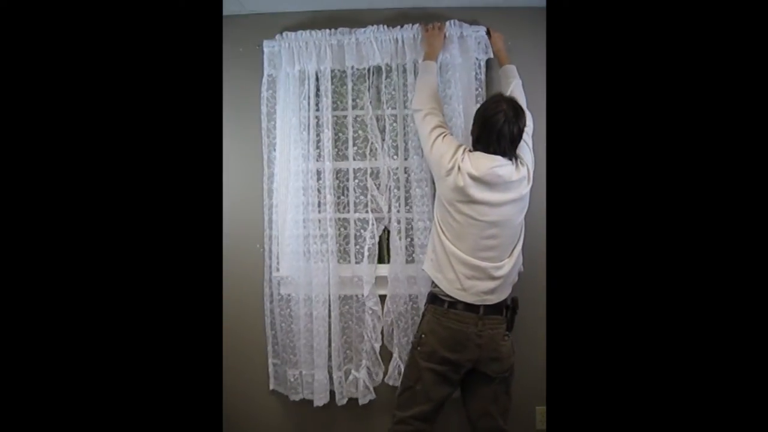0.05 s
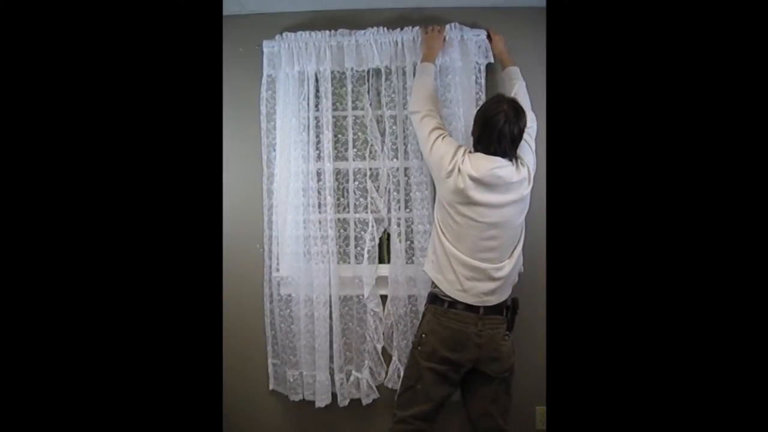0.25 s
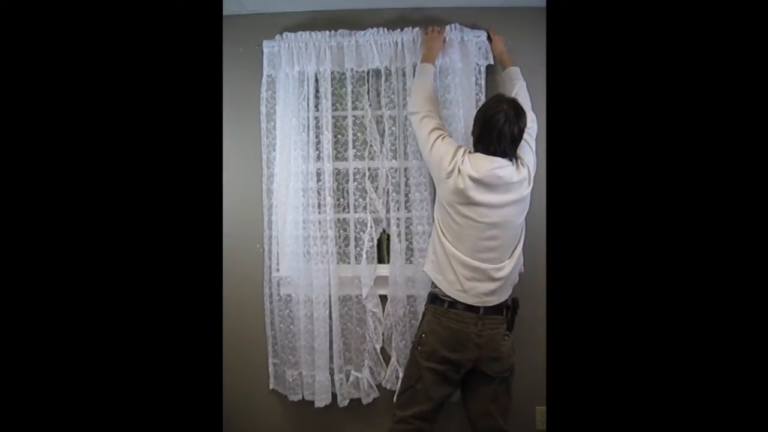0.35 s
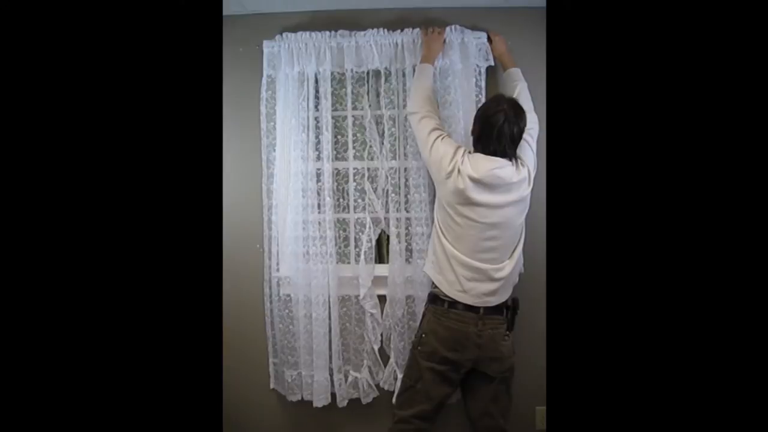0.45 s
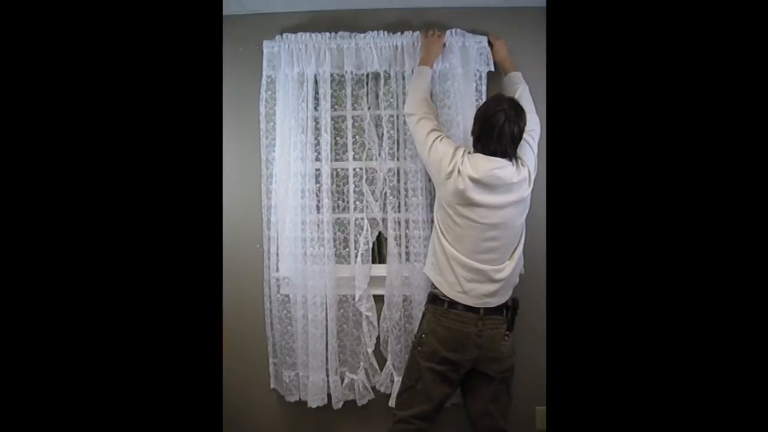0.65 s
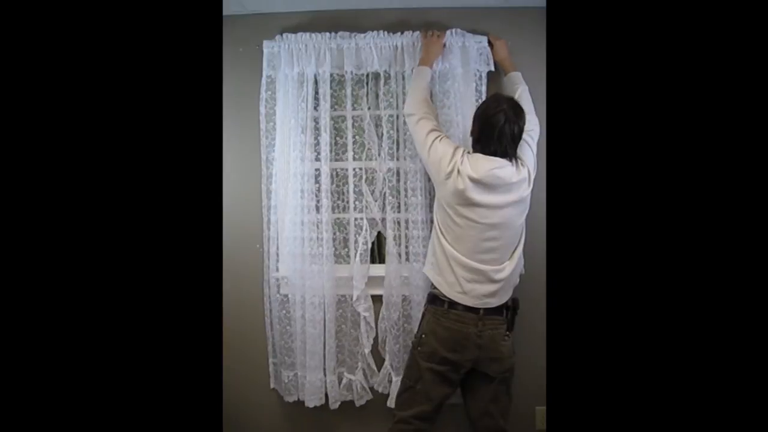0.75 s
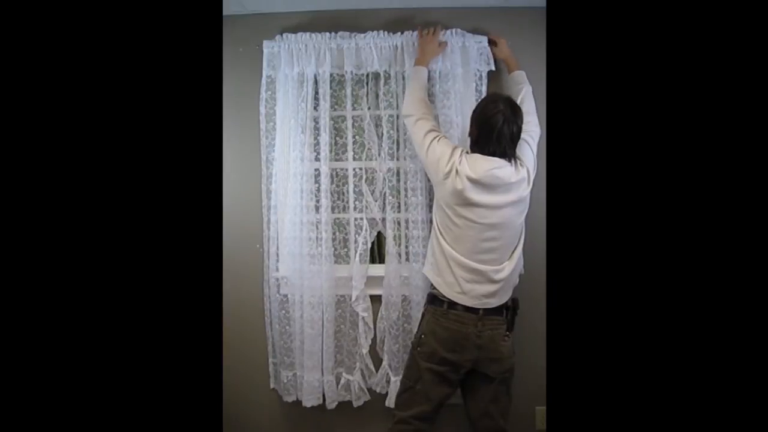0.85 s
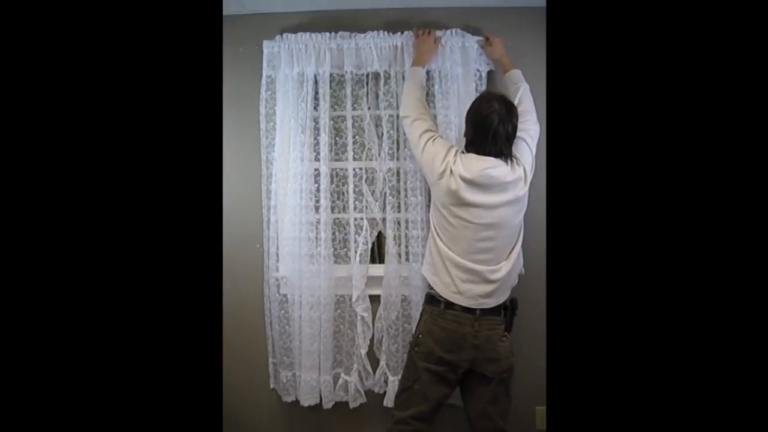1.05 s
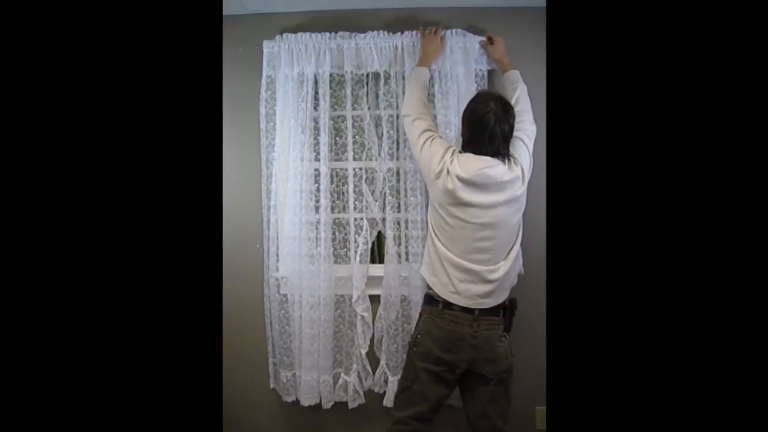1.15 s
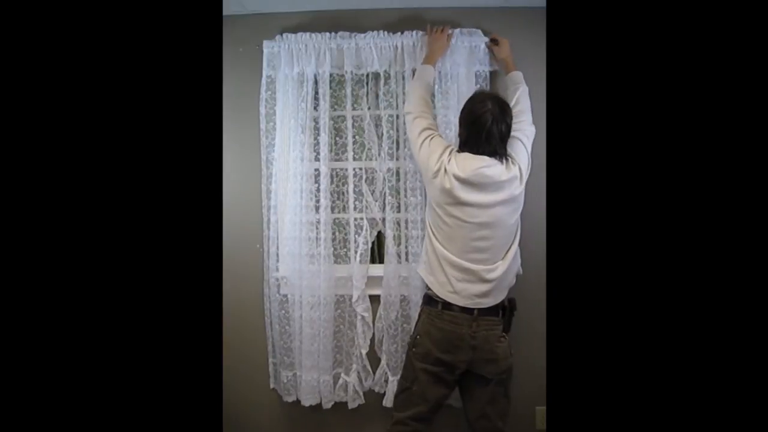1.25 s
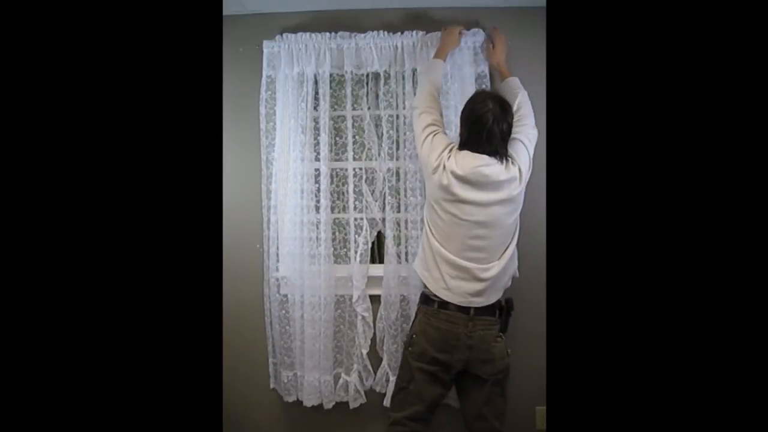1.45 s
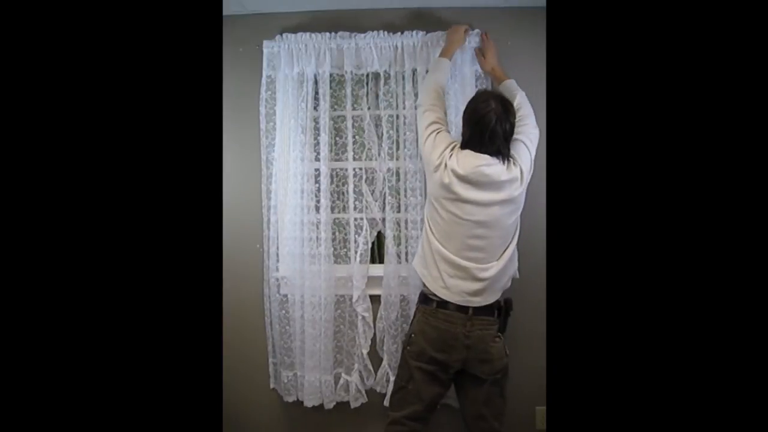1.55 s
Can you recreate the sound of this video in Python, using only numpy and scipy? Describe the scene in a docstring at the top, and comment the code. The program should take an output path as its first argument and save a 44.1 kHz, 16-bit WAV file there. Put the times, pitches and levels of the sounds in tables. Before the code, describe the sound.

Short, ringing metal knocks of a curtain rod hitting its bracket, over quiet room hiss.

```python
"""A bare, ringing room, where a metal curtain rod is pushed against its wall bracket.
Each knock is a short chattering crack, a ring of the hollow rod and a thud of the wall behind it.
The curtain rustles faintly along the rod over a bed of hiss, soft drone and low hum.
Everything is heard from a few metres away, nearly mono."""
import sys
import numpy as np
from scipy import signal
from scipy.fft import rfft, irfft
from scipy.io import wavfile

SR = 44100
rng = np.random.default_rng(int(sys.argv[2]) if len(sys.argv) > 2 else 0)


def to_wav(sig):
    """Store sig (one row per channel, or 1-D mono) as 16-bit WAV at the path in sys.argv[1].

    Samples outside -1..1 are clipped; the rate is SR.
    """
    pcm = np.clip(np.atleast_2d(sig), -1, 1) * 32767
    pcm = np.round(pcm).astype(np.int16)
    wavfile.write(sys.argv[1], SR, pcm.T)  # frames by channels


N = 70560

# tone of the room hiss (frequency [Hz], relative level [dB])
HISS_TONE = [(20, -28), (38, -16), (52, -33), (70, -13), (105, -10), (135, -5), (175, -8.5), (225, -7),
             (330, -9), (480, -10.5), (790, -12.5), (1300, -18.5), (2200, -24.5), (3300, -26), (6000, -29),
             (7900, -40.5), (10000, -34)]
# fader curve of the low hum (time [s], level [dB])
HUM_FADER = [(0, -61), (.17, -50), (.3, -58), (.5, -61), (.7, -59), (1.0, -73), (1.6, -74)]
# early reflections (delay [s], gain [dB])
EARLY_ECHOES = [(.0015, -17), (.0095, -20), (.0176, -11), (.0238, -20), (.0335, -17)]
# tone of the reflections from the corner of wall and ceiling (frequency [Hz], gain [dB])
CORNER_TONE = [(200, -30), (1500, -27), (2500, 1.5), (4000, 6), (6500, 1), (9000, 0)]
# decay of the reverb tail (frequency [Hz], t60 [s])
TAIL_DECAY = [(150, 0.64), (500, 0.41), (1400, 0.39), (3500, 0.34), (6500, .36), (10000, 0.45)]
# stereo width of the tail (frequency [Hz], side minus mid [dB])
TAIL_WIDTH = [(100, 1.5), (700, -25), (2200, -23), (5000, -17.5), (9000, -15.5)]
# cues for cloth sliding on the rod (time [s], length [s], peak send to the room [dB])
RUSTLE_CUES = [(.85, 0.094, -50.5), (1.272, 0.098, -48), (1.476, 0.3, -44.5)]
# tone of the cloth (frequency [Hz], relative level [dB])
CLOTH_TONE = [(200, -15), (900, -23), (1600, -3), (3000, -2), (5000, -2.5), (7900, -11), (10000, -4.5)]
# modes of the bracket and wall (frequency [Hz], relative level [dB], t60 [s])
WALL_MODES = [(462, -9, .35), (552, -11, .4), (647, -10, .34), (775, -13, .25), (840, -5, .2),
              (915, 0, .28), (977, -6, .22)]
# modes of the hollow rod (frequency [Hz], relative level [dB], t60 [s])
ROD_MODES = [(2031, -5, .29), (2099, -4, .32), (2168, -1, .31), (2281, -7, .22), (2333, -5, .21),
             (2376, -2, .23), (2422, -8, .17), (2906, -8, .23), (2984, -8, .2), (3277, -8, .22),
             (3590, -7, .2), (4476, -6, .11), (4759, -13, .2)]
# tone of the crack (frequency [Hz], relative level [dB])
CRACK_TONE = [(60, -24), (200, -14.5), (380, -7), (620, -6.5), (950, 4.5), (1250, -3.5), (1700, -3.5),
              (2300, 2.5), (3000, 0), (4300, -1), (6400, -3.5), (7900, -15.5), (10000, -9)]
# knock cues (time [s], crack trim [dB], rod ring trim [dB], wall thud trim [dB],
# crack high cut [Hz], contact pitch [Hz], boost or cut at that pitch [dB])
KNOCK_CUES = [(0.0344, -12.5, -33, -10, 4810, 3760, 1), (0.2378, -2, 1, -8, 13600, 9060, 10.5),
              (0.2425, -1.5, -31.5, 1.5, 9800, 4400, 0), (0.2765, -10, -15, 1, 9000, 2320, 11),
              (0.306, -12, -8, -7, 9100, 490, -9), (0.4559, 5, -8, -3.5, 9200, 1840, 5),
              (0.6552, -7.5, -45, -4, 13000, 4400, -1.5), (0.8195, -21, -48, -13, 6240, 557, 18),
              (0.936, -28.5, -36, -29, 6480, 4700, 6.5)]


def amp(db):
    """Decibels to gain."""
    return 10 ** (np.asarray(db) / 20)


def unit_rms(x):
    """Scales to an rms of 1."""
    return x / np.sqrt(np.mean(x ** 2) + 1e-20)


def curve_at(points, hz):
    """Reads a curve on a log-frequency axis."""
    table_hz, values = np.transpose(points)
    return np.interp(np.log(hz + 1), np.log(table_hz + 1), values)


def add(mix, start_s, sound):
    """Drops a sound into the mix at its cue."""
    part = mix[max(round(start_s * SR), 0):][:len(sound)]
    part += sound[:len(part)]


def equalise(x, tone):
    """Shapes a signal with a tone curve."""
    hz = np.fft.rfftfreq(len(x), 1 / SR)
    return irfft(rfft(x) * amp(curve_at(tone, hz)), len(x))


def room_tone(hiss_db=-44.5, drone_db=-50, drone_hz=169.5, drone_width_hz=16.3, hum_hz=51.3):
    """The bed: steady hiss, a narrow band of noise that wavers as a drone, and a low hum that fades."""
    t = np.arange(N) / SR
    mid, side = (unit_rms(equalise(rng.standard_normal(N), HISS_TONE)) for _ in range(2))
    side *= amp(-35)  # nearly mono
    hiss = amp(hiss_db) * np.array([mid + side, mid - side])
    band = np.exp(-((np.fft.rfftfreq(N, 1 / SR) - drone_hz) / drone_width_hz) ** 2)
    drone = amp(drone_db) * unit_rms(irfft(rfft(rng.standard_normal(N)) * band, N))
    hum_gain = amp(np.interp(t, *np.transpose(HUM_FADER)))
    hum = hum_gain * unit_rms(np.sin(2 * np.pi * (hum_hz * t + rng.random())))
    return hiss + drone + hum


def reverb_tail(level_db=0.5, rise_s=0.008):
    """Mid and side of the dense reflections, which build up quickly and die away band by band."""
    hz, frame_s, bands = signal.stft(rng.choice([-1., 1.], (2, SR)), SR, nperseg=256)
    bands *= amp(-60 * frame_s / curve_at(TAIL_DECAY, hz)[:, None])
    bands[1] *= amp(curve_at(TAIL_WIDTH, hz))[:, None]
    fade_in = 1 - np.exp(-np.arange(SR) / SR / rise_s)
    tail = signal.istft(bands, SR, nperseg=256)[1][:, :SR] * fade_in
    return amp(level_db) * tail / np.linalg.norm(tail[0])


def in_room(sound, direct_db=-13, corner_db=-6.5, corner_delay_s=.0042, corner_spread_s=.002):
    """Puts a sound in the stereo room: direct path, a bright splash off the corner, echoes and tail."""
    t = np.arange(SR) / SR
    mid, side = reverb_tail()
    splash = rng.standard_normal(SR) * np.exp(-((t - corner_delay_s) / corner_spread_s) ** 2)
    mid += amp(corner_db) * equalise(splash / np.linalg.norm(splash), CORNER_TONE) * (t < .5)
    mid[0] += amp(direct_db)
    for delay_s, db in EARLY_ECHOES:
        add(mid, delay_s, amp([db]))
    response = np.array([mid + side, mid - side])
    return signal.fftconvolve(sound[None], response, axes=1)[:, :N]


def curtain_rustle(grains_per_s=1000, spread_db=6):
    """Fine grains of cloth slipping along the rod, swelling and fading."""
    grains = (rng.random(N) < grains_per_s / SR) * rng.standard_normal(N)
    grains *= amp(spread_db * np.minimum(rng.exponential(1, N), 4))  # a few grains stick out
    swells = np.zeros(N)
    for start_s, length_s, db in RUSTLE_CUES:
        add(swells, start_s, amp(db) * np.hanning(round(length_s * SR)))
    return in_room(swells * unit_rms(equalise(grains, CLOTH_TONE)))


def struck_modes(modes, attack_s=.0018):
    """One blow sets the rod or wall ringing, each mode dying at its own rate."""
    t = np.arange(SR) / SR
    ring = sum(amp(db - 60 * t / t60) * np.sin(2 * np.pi * (hz * t + rng.random()))
               for hz, db, t60 in modes)
    return ring * (1 - np.exp(-t / attack_s))


def metal_crack(high_cut_hz, pitch_hz, boost_db, chatter_s=0.0014, bell_octaves=.22, size=4096):
    """Metal chatters briefly on metal after the first touch, coloured by the spot that is hit."""
    t = np.arange(size) / SR
    hz = abs(np.fft.fftfreq(size, 1 / SR))
    chatter_spectrum = np.fft.fft(rng.standard_normal(size) * np.exp(-t / chatter_s))
    spot_db = boost_db * np.exp(-(np.log2((hz + 1) / pitch_hz) / bell_octaves) ** 2 / 2)
    tone = amp(curve_at(CRACK_TONE, hz) + spot_db) / np.hypot(1, (hz / high_cut_hz) ** 2)
    gain = tone / (abs(chatter_spectrum) + 1e-6)  # evens out the chatter's random peaks
    minimum_phase_eq = np.exp(np.conj(signal.hilbert(np.log(gain))))  # keeps the attack sharp
    return np.fft.ifft(chatter_spectrum * minimum_phase_eq).real[:size // 2]


def rod_knocks(crack_db=13, ring_db=-19.5, thud_db=-27.5, send_db=7, send_t60_s=0.079, dry_db=-1):
    """The rod hits its bracket: the contact cracks, the tube rings and the wall thuds."""
    t = np.arange(N) / SR
    mix = np.zeros((2, N))
    for start_s, crack_trim, ring_trim, thud_trim, high_cut_hz, pitch_hz, boost_db in KNOCK_CUES:
        contact, body = np.zeros((2, N))
        add(contact, start_s, amp(crack_db + crack_trim) * metal_crack(high_cut_hz, pitch_hz, boost_db))
        add(body, start_s, amp(ring_db + ring_trim) * struck_modes(ROD_MODES))
        add(body, start_s, amp(thud_db + thud_trim) * struck_modes(WALL_MODES))
        # the loud start of the ring is what fills the room
        body_send = body * amp(send_db - 60 * np.maximum(t - start_s, 0) / send_t60_s)
        mix += in_room(contact + body_send) + amp(dry_db) * body
    return mix


def scene():
    """Knocks up front, with the curtain and the room tone underneath."""
    return rod_knocks() + curtain_rustle() + room_tone()


def record(dry, high_cut_hz=10600):
    """A steep high cut takes the air off the whole mix."""
    low_pass = signal.firwin(401, high_cut_hz, window=("kaiser", 9), fs=SR)
    return signal.oaconvolve(dry, low_pass[None], "same")


dry = scene()
out = record(dry)
to_wav(out)
```